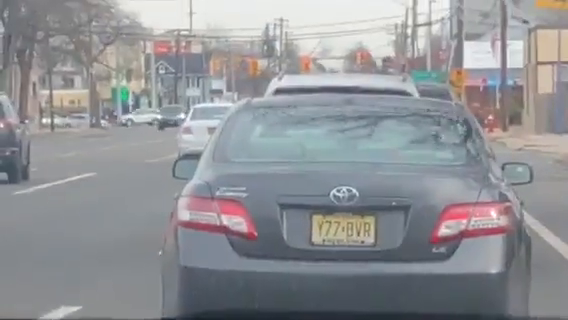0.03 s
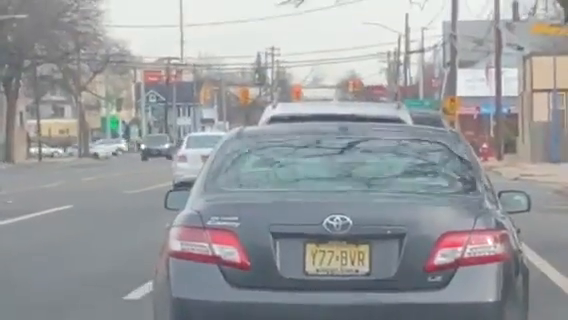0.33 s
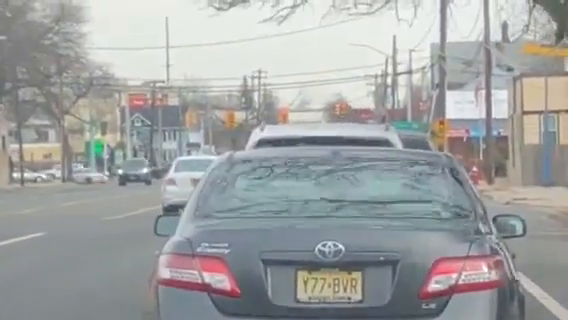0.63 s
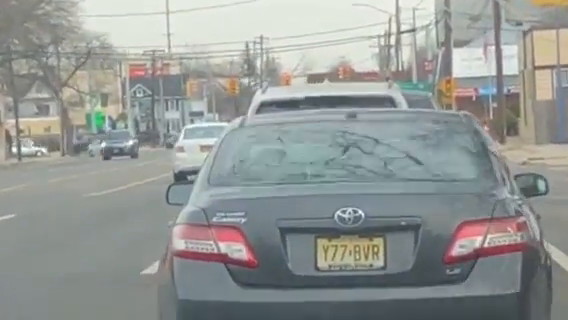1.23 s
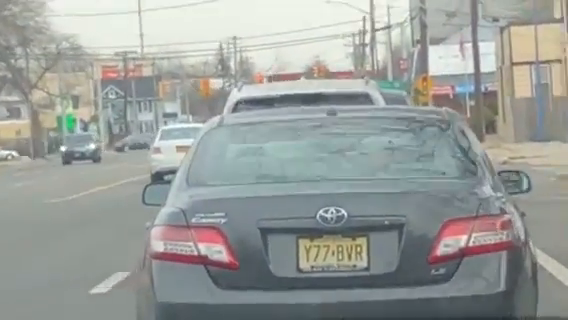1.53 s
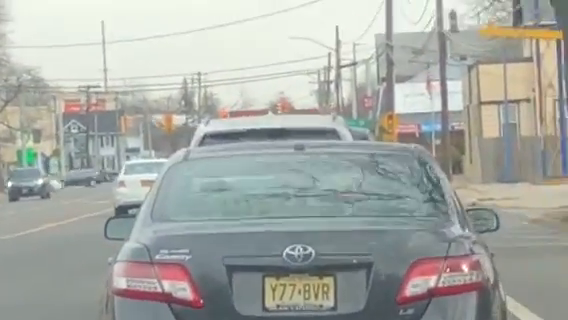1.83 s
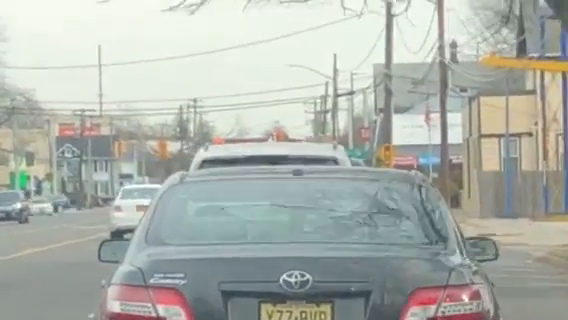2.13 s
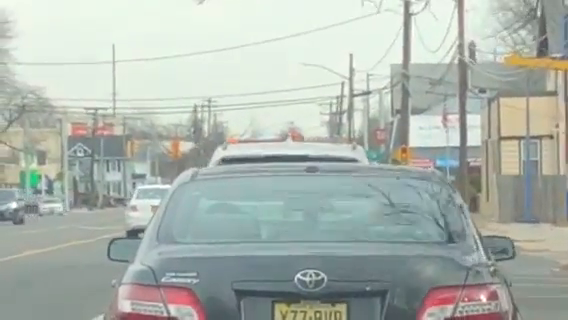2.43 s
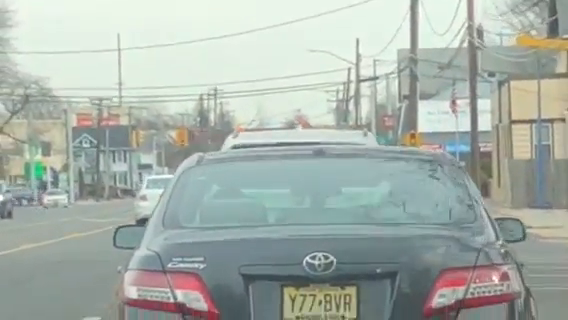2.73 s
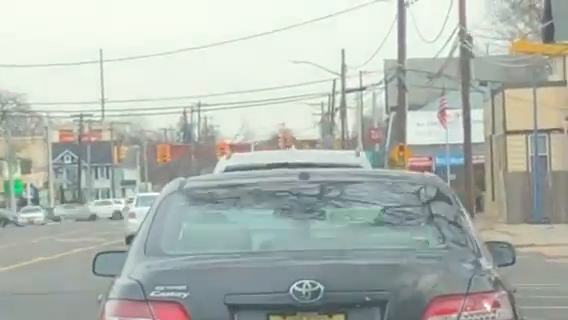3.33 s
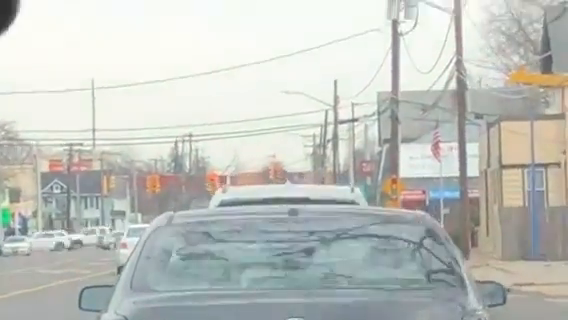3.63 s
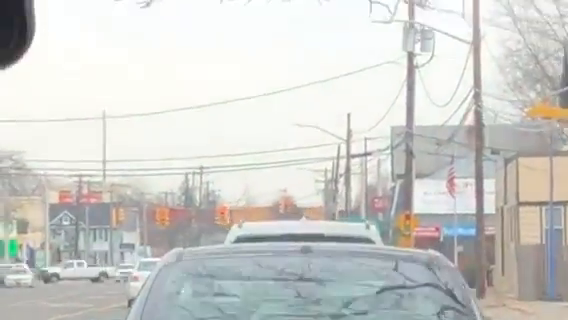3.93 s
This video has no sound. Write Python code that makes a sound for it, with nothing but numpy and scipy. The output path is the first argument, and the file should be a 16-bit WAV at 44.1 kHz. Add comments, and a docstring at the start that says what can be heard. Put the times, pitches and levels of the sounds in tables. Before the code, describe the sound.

A car's cabin rumbles and booms softly as it rolls along a street.

```python
"""Inside a closed car rolling along a town street. From the start the road shakes the body into a low
rumble and drives a cabin resonance near 80 Hz in slow swells, under tyre roar and a soft rush of air.
At 1.3 s and 1.8 s plastic trim slips and rings in ticks, then scuffs. From about 2 s to 3 s the air
whistles faintly; from 2.4 s something brushes three times. The boom swells most near 2.9 s."""
import sys
import numpy as np
from scipy.fft import rfft, irfft, next_fast_len
from scipy.io import wavfile
from scipy.ndimage import map_coordinates

SR = 44100
rng = np.random.default_rng(int(sys.argv[2]) if len(sys.argv) > 2 else 0)


def dump_mix(stems):
    """Bounce the given channels to the path in sys.argv[1] as a 16-bit WAV at rate SR."""
    frames = np.atleast_2d(stems).T  # one column per channel
    limited = np.clip(frames, -1, 1)  # hard clip at full scale
    pcm = np.round(limited * 32767).astype(np.int16)
    wavfile.write(sys.argv[1], SR, pcm)


N = 176400


def amp(db):
    """Amplitude ratio of a level in decibels."""
    return 10 ** (np.asarray(db) / 20)


def unit(x):
    """Normalisation to rms 1."""
    return x / np.sqrt(np.mean(x ** 2) + 1e-30)


def curve(rows):
    """Linear interpolation of (t/s, value) points, one value per sample."""
    return np.interp(np.arange(N) / SR, *np.transpose(rows))


def wobble(rate):
    """Random modulation: a spline through `rate` Gaussian knots a second."""
    return map_coordinates(rng.standard_normal(1024), [np.arange(N) * rate / SR], mode="wrap")


def swell(centre, length):
    """Gaussian envelope, `length` seconds wide between its 1/e points."""
    return np.exp(-(2 * (np.arange(N) / SR - centre) / length) ** 2)


def filtered(x, response):
    """Linear filtering: the spectrum of x times a frequency response."""
    size = next_fast_len(N + SR // 2)
    return irfft(rfft(x, size) * response(np.fft.rfftfreq(size, 1 / SR)), size)[:N]


def resonance(f, hz, width_hz):
    """Velocity response of a damped oscillator, 1 at its natural frequency."""
    return 1j * f * width_hz / (hz * hz - f * f + 1j * f * width_hz)


def noise(spectrum):
    """Spectral shaping: noise of rms 1 follows (f/Hz, level/dB) points on a log frequency axis."""
    hz, db = np.transpose(spectrum)
    gain = lambda f: amp(np.interp(np.log(f + 1), np.log(hz + 1), db))
    return unit(filtered(rng.standard_normal(N), gain))


def narrow_noise(hz, width_hz):
    """Narrow-band noise of rms 1: white noise passed twice through one resonance."""
    return unit(filtered(rng.standard_normal(N), lambda f: resonance(f, hz, width_hz * 2) ** 2))


def noise_bursts(rows, spectrum):
    """Amplitude modulation: shaped noise rises and fades once per (t/s, length/s, level/dB) row."""
    return noise(spectrum) * sum(amp(db) * swell(centre, length) for centre, length, db in rows)


# spectrum of the rushing air: f/Hz, relative level/dB
AIR_SPECTRUM = [(500, -8), (2500, 2), (3400, -0.5), (4200, -4), (4600, -2.5), (5100, -7), (5600, -9.5),
                (8000, -13.5), (11000, -16.5), (15500, -18)]
# envelopes of the rush and the whistle: t/s, level/dB
RUSH_ENVELOPE = [(0, -73.5), (1.4, -72.5), (2.3, -72.5), (4, -72)]
WHISTLE_ENVELOPE = [(1.8, -100), (2.15, -82.5), (2.9, -82.5), (3.2, -90.5)]

def air():
    """Flow noise: air around the cabin gives a broadband rush and, for a second, a narrow whistle."""
    rush = amp(curve(RUSH_ENVELOPE) + 0.36 * wobble(9)) * noise(AIR_SPECTRUM)
    whistle = amp(curve(WHISTLE_ENVELOPE)) * narrow_noise(hz=3480, width_hz=160)
    return rush + whistle


# brush strokes: t/s, length/s, level/dB
BRUSH_STROKES = [(2.425, .08, -79.5), (2.99, 0.098, -77.5), (3.12, .07, -78)]
# their spectrum: f/Hz, relative level/dB
BRUSH_SPECTRUM = [(3000, -26), (7000, -10), (11000, -2), (14500, 4), (16000, 4)]

def brushing():
    """Friction noise: each light stroke is a faint, high hiss."""
    return noise_bursts(BRUSH_STROKES, BRUSH_SPECTRUM)


# scuff of the trim: t/s, length/s, level/dB
SCUFF_STROKES = [(1.865, 0.06, -71.5)]
# its spectrum: f/Hz, relative level/dB
SCUFF_SPECTRUM = [(800, -24), (2400, 7), (4500, -10), (7500, -10), (11000, -22), (16000, -38)]

def trim_scuff():
    """Sliding friction: the trim rubs in one soft burst of noise."""
    return noise_bursts(SCUFF_STROKES, SCUFF_SPECTRUM)


# slips of the trim: t/s, relative force level/dB, decay time T60/s
TRIM_SLIPS = [(1.3426, -59, 0.0066), (1.7541, -54.5, 0.029), (1.78, -70, 0.029)]
# modes of the plastic: f/Hz, bandwidth/Hz, relative level/dB
TRIM_MODES = [(1300, 250, 6), (2250, 600, 1.5), (3650, 320, 1.5), (5350, 260, 0), (6640, 900, -9),
              (9300, 3100, -16), (13600, 5000, -20)]

def trim_ticks(attack_s=0.00044, gain_db=11.5):
    """Modal ringing: each short, gritty slip excites the damped modes of the plastic."""
    t, force = np.arange(N) / SR, np.zeros(N)
    for onset, db, t60 in TRIM_SLIPS:
        age = np.maximum(t - onset, 0)
        envelope = amp(db - 60 * age / t60) * (1 - np.exp(-age / attack_s))
        force += envelope * rng.standard_normal(N)
    # neighbouring modes add with opposite signs
    plastic = lambda f: sum((-1) ** k * amp(db) * resonance(f, hz, width_hz)
                            for k, (hz, width_hz, db) in enumerate(TRIM_MODES))
    return amp(gain_db) * filtered(force, plastic)


# spectrum of the tyre roar: f/Hz, relative level/dB
TYRE_SPECTRUM = [(100, -22.5), (300, -2.5), (400, -1), (520, 0), (610, -3.5), (900, -4.5), (1050, -8.5),
                 (1550, -13), (2100, -23), (3500, -38), (8000, -73)]
# its envelope, easing as the car slows: t/s, level/dB
TYRE_ENVELOPE = [(0, -54), (1.0, -55), (2.2, -55), (4, -55.5)]

def tyres(tread_db=-6.5):
    """Rolling noise: rubber on asphalt gives a broad roar with one tread resonance."""
    roar = noise(TYRE_SPECTRUM)
    tread = amp(tread_db) * narrow_noise(hz=763, width_hz=73)
    return amp(curve(TYRE_ENVELOPE) + 0.3 * wobble(12)) * (roar + tread)


# spectra of the body's shake and the panels' rumble: f/Hz, relative level/dB
SHAKE_SPECTRUM = [(15, -45), (24, -24.5), (30, -6), (45, -3), (56, 1), (68, -2.5), (85, -16.5),
                  (130, -36.5), (300, -100)]
PANEL_SPECTRUM = [(30, -51.5), (58, -12.5), (67, 1), (80, 0), (93, 2), (112, 1), (150, -3.5), (172, -9),
                  (190, -6), (240, -12), (285, -19), (335, -19), (450, -36.5), (1500, -100)]
# bumps in the road: t/s, length/s, level/dB
ROAD_BUMPS = [(.7, .16, -43), (1.0, 0.14, -41), (1.65, 0.14, -45.5), (2.0, 0.14, -45), (2.21, 0.11, -52),
              (2.67, 0.1, -47), (3.81, .14, -42)]
# panel rumble set by the road's roughness: t/s, level/dB
PANEL_ENVELOPE = [(0, -39.5), (.8, -42.5), (1.35, -45.5), (2.0, -42.5), (3.1, -42), (3.8, -40), (4, -41.5)]

def road_rumble(shake_db=-49):
    """Forced vibration: the road shakes the body, harder over bumps, and its roughness drives panels."""
    shake = amp(shake_db) * noise(SHAKE_SPECTRUM)
    bumps = noise_bursts(ROAD_BUMPS, SHAKE_SPECTRUM)
    panels = amp(curve(PANEL_ENVELOPE) + 0.63 * wobble(8)) * noise(PANEL_SPECTRUM)
    return shake + bumps + panels


# swells of the boom as the wheels meet dips in the road: t/s, length/s, level/dB
CABIN_SWELLS = [(0.124, 0.16, -38), (0.366, .14, -40), (0.758, .17, -35.5), (0.914, 0.11, -39),
                (1.143, .11, -38.5), (1.6, 0.1, -37.5), (2.403, .11, -36), (2.509, 0.048, -35),
                (2.632, .13, -33), (2.865, 0.09, -31.5), (2.99, 0.058, -37.5), (3.1, 0.091, -39.5),
                (3.232, .12, -36.5), (3.63, 0.18, -42), (3.834, 0.083, -38)]

def cabin_boom(centre_hz=80, wander_hz=3.15, floor_db=-46, flutter_db=1.07):
    """Cavity resonance: driven by the road, the cabin's low mode swells, sinks and wanders in pitch."""
    swell_power = sum((amp(db) * swell(centre, length)) ** 2 for centre, length, db in CABIN_SWELLS)
    envelope = np.sqrt(amp(floor_db) ** 2 + swell_power)
    hz = centre_hz + wander_hz * wobble(16)
    tone = unit(np.sin(2 * np.pi * np.cumsum(hz) / SR))
    return envelope * amp(flutter_db * wobble(20)) * tone


def scene():
    """Superposition: all sources add at the front seat, in one channel."""
    small_sounds = trim_ticks() + trim_scuff() + brushing()
    return (cabin_boom() + road_rumble() + tyres() + air() + small_sounds)[None]


def record(dry):
    """Band limiting: an ideal low-pass filter removes the highest treble."""
    cutoff_hz = 15750
    return filtered(dry[0], lambda f: f < cutoff_hz)[None]


dry = scene()
out = record(dry)
dump_mix(out)
```